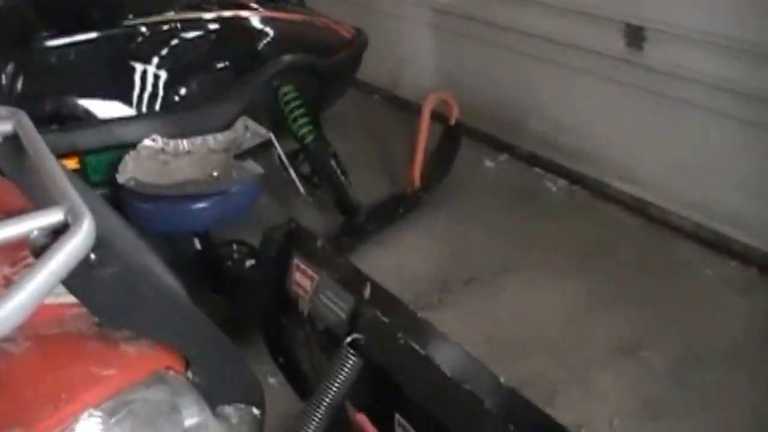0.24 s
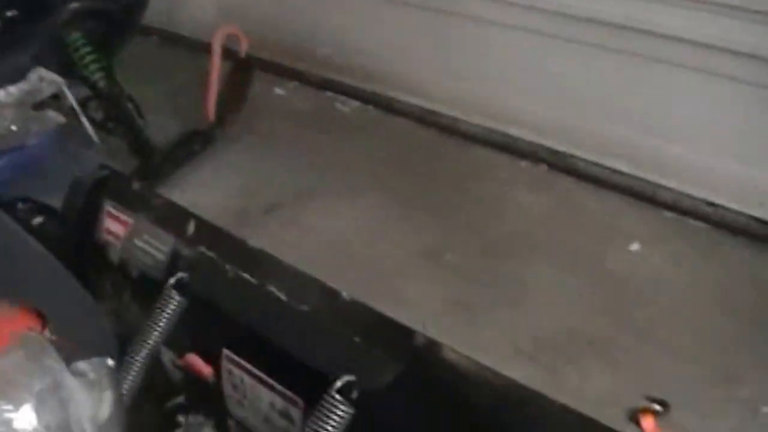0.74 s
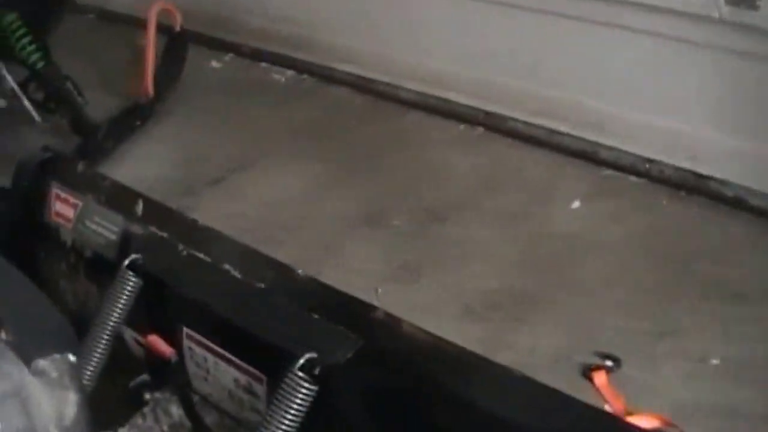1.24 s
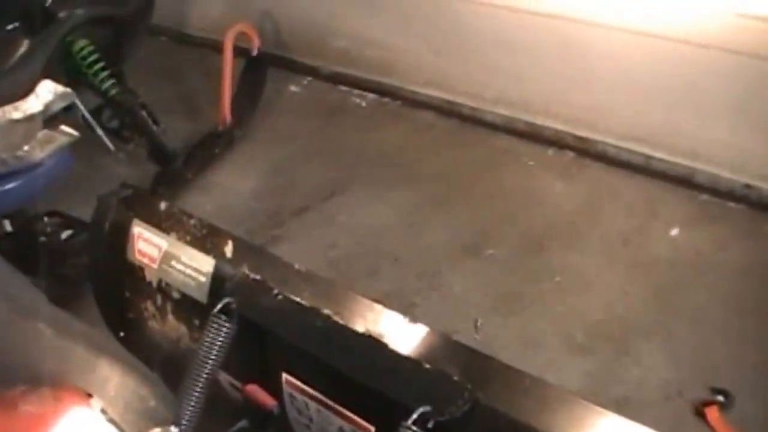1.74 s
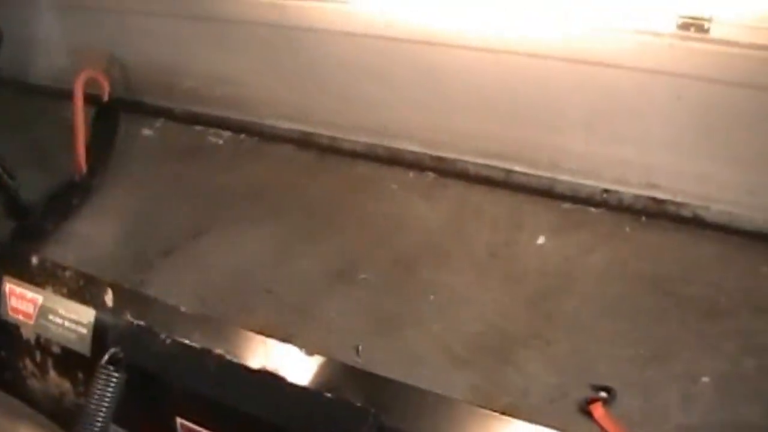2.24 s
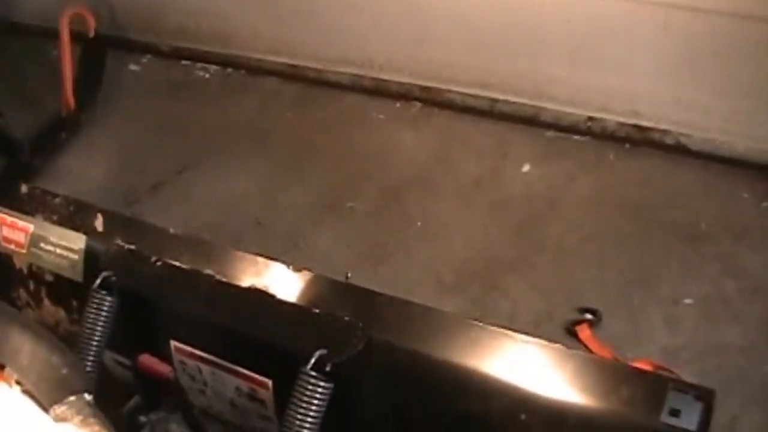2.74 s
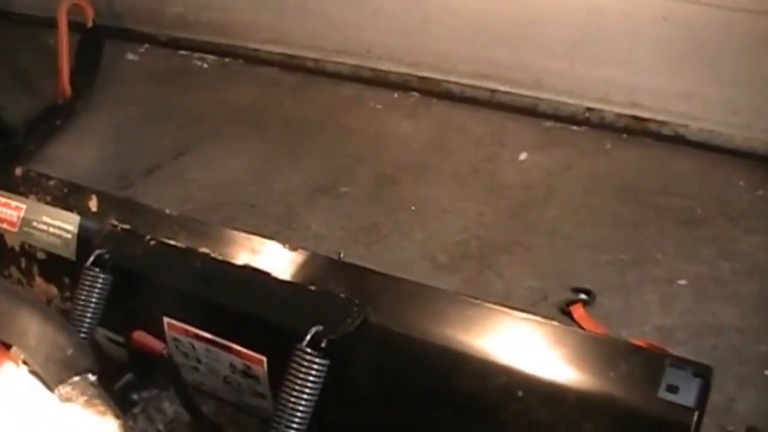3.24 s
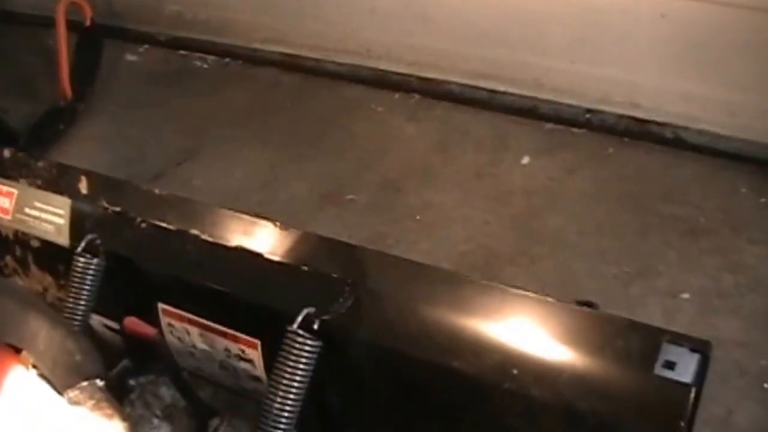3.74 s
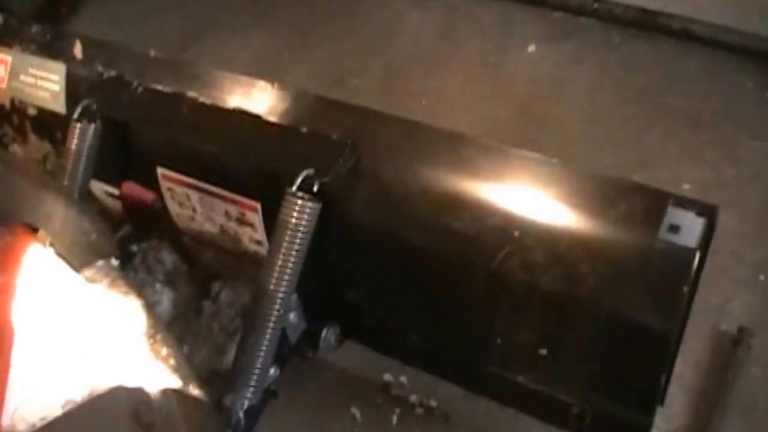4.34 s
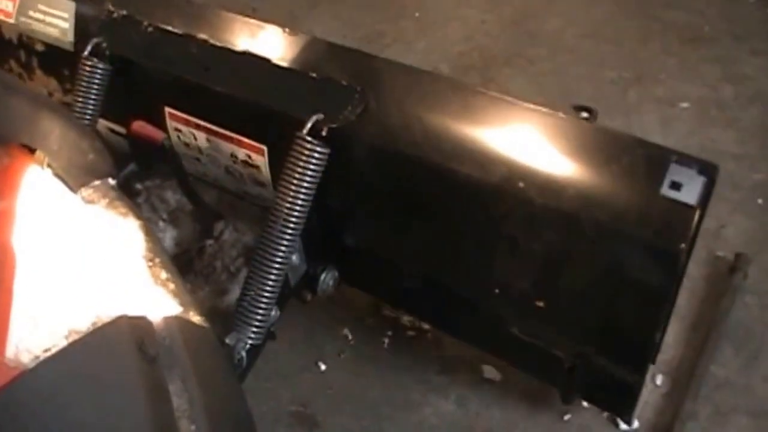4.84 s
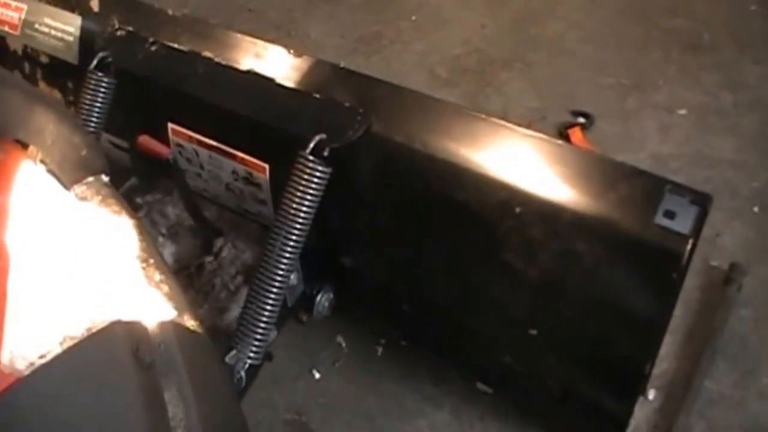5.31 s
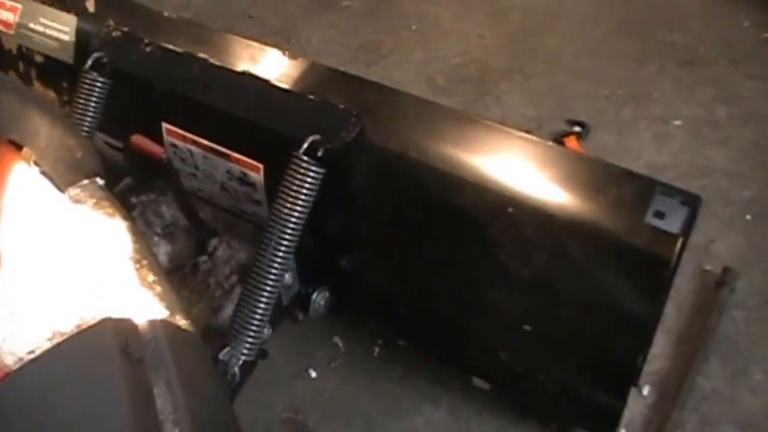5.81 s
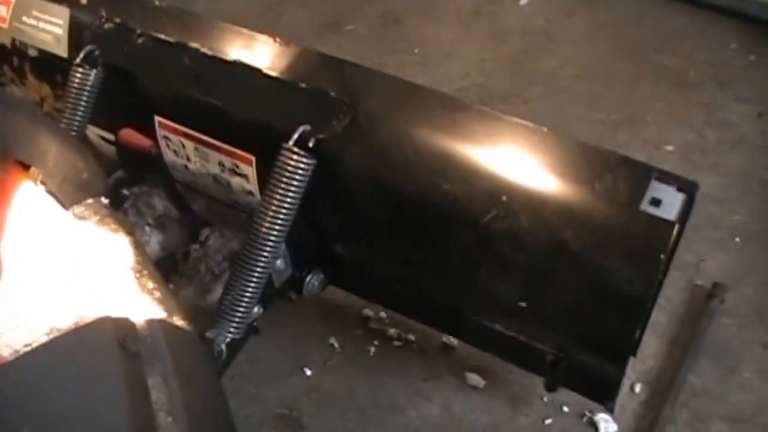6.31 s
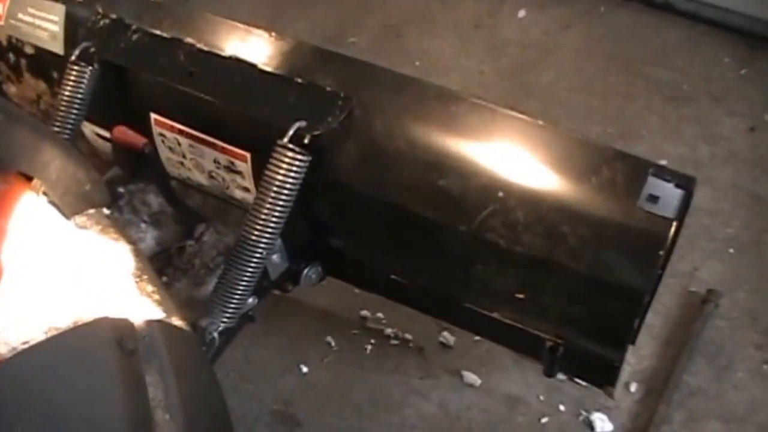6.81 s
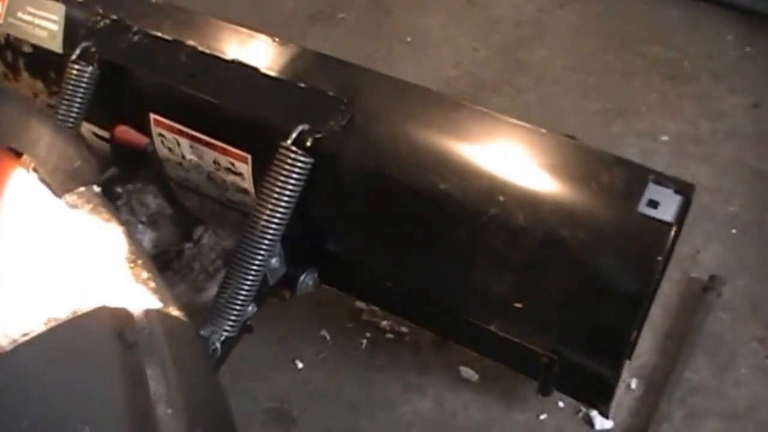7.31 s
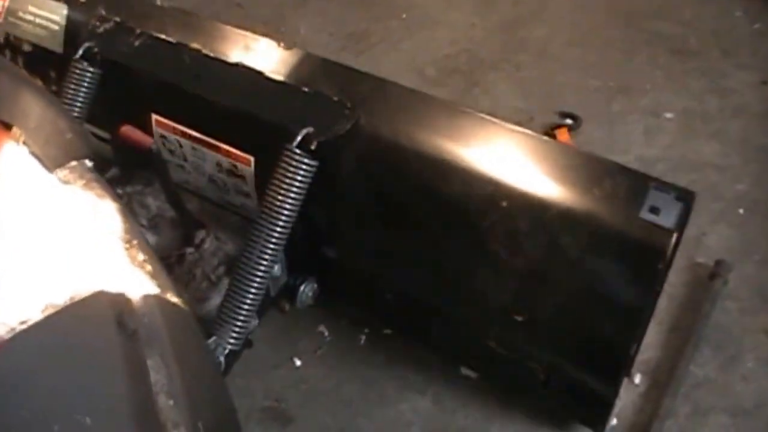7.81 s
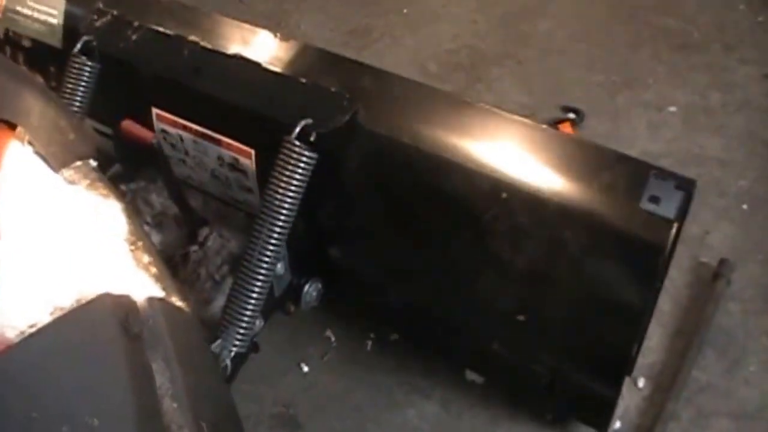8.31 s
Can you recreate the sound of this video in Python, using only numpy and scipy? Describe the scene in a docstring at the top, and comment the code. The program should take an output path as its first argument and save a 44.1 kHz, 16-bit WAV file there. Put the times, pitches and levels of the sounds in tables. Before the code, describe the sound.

A quiet garage with soft hiss: cloth rubs, a few sharp clicks, a high buzzing pump whirr. Then hard relay clacks each launch a loud, rough electric winch whine, lowering and lifting a steel plough blade in turn. The blade clanks and hums as it jolts and lands. Close stereo microphone, hard-walled reverberation, short pauses between the runs.

```python
"""Plough winch in a garage

An electric winch lowers and lifts a steel plough blade in a concrete garage, close to a camera's stereo microphone.
First hands shuffle, small parts click and a fuel pump whirrs: repeating noise, whistles, buzz and a low hum.
Then a solenoid clacks before each motor run: tooth overtones over gearbox noise and brush hiss.
The blade rings at each jolt in decaying sines, and the garage answers with echoes of shaped noise.
Thuds of the frame and a quiet floor of hiss and faint tones lie beneath.
"""
import sys
import numpy as np
from scipy import signal
from scipy.fft import rfft, irfft, next_fast_len
from scipy.io import wavfile
from scipy.ndimage import uniform_filter1d, map_coordinates

SR = 44100
rng = np.random.default_rng(int(sys.argv[2]) if len(sys.argv) > 2 else 0)


def master_out(mix):
    """Clip the mix to full scale and print it as 16-bit PCM to the path in sys.argv[1]."""
    frames = np.transpose(np.atleast_2d(mix))
    ceiling = np.clip(frames, -1, 1)
    pcm = np.round(ceiling * 32767).astype(np.int16)
    wavfile.write(sys.argv[1], SR, pcm)


N = 377496
TIME = np.arange(N) / SR

# Levels are relative: trims in the functions and in scene() set the final balance.
# Motor runs, lowering and lifting in turn: [start t/s, powered t/s, brush hiss level/dB, gear growl level/dB,
# full tooth rate f/Hz, spin-up t/s, coasting fade of the hiss (dB/s)]
MOTOR_RUNS = [(2.797, .15, -18, -18.5, 580, .05, 140), (3.32, 0.72, -20, -21, 548, .06, 141),
              (4.49, 0.69, -20, -20, 533, 0.067, 107), (5.736, 0.87, -19, -20.5, 540, .06, 191),
              (6.945, 0.92, -20.5, -20, 528, .055, 84), (8.212, 0.55, -19.5, -20, 553, .055, 150)]
# Overtones of the tooth rate: [multiple, lifting level/dB, lowering level/dB]
TOOTH_OVERTONES = [(.5, -19.5, -23.5), (1, -7, -8), (2, -4, -3), (3, -5, -15), (4, -14.5, -12.5),
                   (5, -10, -22), (6, -18, -20.5), (7, -19, -33), (8, -18, -24), (10, -17, -23)]
# Gearbox noise: [f/Hz, level/dB per Hz]
GEARBOX_SPECTRUM = [(15, -65), (25, -72), (134, -43), (248, -12.5), (341, -8.5), (532, 2), (763, -5.5),
                    (1070, 1), (1270, -3), (1640, -0.5), (4000, -22), (5200, -65), (8800, -120)]
# Brush hiss: [f/Hz, level/dB per Hz]
BRUSH_SPECTRUM = [(1180, -25.5), (2000, -4), (2160, -4.5), (2420, -6.5), (2630, -2), (2870, -4.5),
                  (3440, -4.5), (7460, 1), (10800, -18.5), (15600, -47.5)]
# Dull rumble left after coasting: [f/Hz, level/dB per Hz]
REST_SPECTRUM = [(71, -55), (120, -22), (166, -13), (311, -11.5), (361, -6), (678, -3.5), (1150, -16.5),
                 (1660, -15.5), (4000, -24), (5200, -56), (8800, -120)]
# Brief dips of the motor's level: [t/s, depth/dB]
MOTOR_DIPS = [(4.883, 11.7), (7.849, 7)]
# Blade jolted as the rope takes up slack and as it lands on the floor: [t/s, level/dB]
BLADE_JOLTS = [(2.828, -32), (3.335, -12.5), (4.375, -33), (4.507, -19.5), (5.165, -14.5), (5.775, -22),
               (7.77, -14.5), (8.228, -23)]
# Ringing modes of the steel blade: [f/Hz, level/dB, t60/s, rise t/s]
BLADE_MODES = [(434, -4.5, 0.74, 0.0074), (701, 5.5, 0.31, 0.0071), (760, 2, 0.35, 0.008),
               (980, -7, 0.11, 0.0048), (1225, 12, 0.14, 0.0067)]
# Low hums as the landed blade rocks: [t/s, level/dB]
BLADE_ROCKS = [(3.05, -50), (5.2, -42), (5.45, -47), (7.85, -37), (8.1, -37)]
# Solenoid closing: [t/s, peak level/dB, thump/dB over that level]
SOLENOID_CLACKS = [(2.7934, -6, -23), (3.3157, -6.5, -34), (4.4862, -7, -21), (5.7333, -5, -6.5),
                   (6.9425, -8.5, -15), (8.2101, -7, -9)]
# Key, switch and linkage clicks: [t/s, peak level/dB, thump/dB over that level, t60/s]
SMALL_CLICKS = [(0.4979, -47, 6, 0.063), (0.674, -30.5, -25.5, 0.13), (1.032, -21, -3, 0.06),
                (1.042, -26, -4, 0.06), (1.0628, -27, -1, 0.071), (1.951, -36, -6, 0.04),
                (1.253, -31, 2, 0.085), (1.292, -12, -11, 0.055), (1.866, -28.5, -3, 0.068),
                (2.3035, -29, 6, 0.13), (3.0018, -14.5, 5.5, 0.12), (3.189, -19, -2, 0.09),
                (3.2194, -32, -29, 0.095), (5.1861, -15, 7, 0.081), (5.4554, -27, 4, 0.062),
                (5.4864, -26, 4.5, 0.078), (5.5357, -20, 2.5, 0.12), (5.676, -34, -2, 0.0988),
                (5.6994, -36, 1, 0.13)]
# Bright noise of clicks and rustling: [f/Hz, level/dB per Hz]
BRIGHT_SPECTRUM = [(700, -39.5), (1500, -3), (2200, 1.5), (3300, 2), (5000, 2.5), (7800, 5.5), (10000, -6),
                   (14000, -18.5), (16000, -51)]
# Low noise of knocks and rubbing: [f/Hz, level/dB per Hz]
THUMP_SPECTRUM = [(120, -28), (300, -15.5), (550, -2.5), (1100, -6), (2000, -9), (4000, -23), (8000, -59)]
# Strokes of hands and clothes: [peak t/s, rustle level/dB, low rub level/dB, brightest f/Hz, rise t/s, t60/s]
HAND_STROKES = [(.45, -50, -48, 7000, .08, 0.15), (.505, -39, -40, 1750, 0.031, 0.38),
                (.72, -35.5, -48, 4100, 0.08, 0.31), (.785, -34, -41.5, 3000, 0.022, 0.15),
                (1.004, -23, -32, 5200, 0.0034, 0.2), (1.035, -31, -29, 2980, 0.018, 0.17),
                (1.06, -30.5, -39, 1800, 0.023, 0.16), (1.31, -32.5, -35.5, 3000, 0.026, 0.73),
                (1.8, -55, -39, 800, 0.042, 0.83), (1.87, -29, -35.5, 2200, 0.0045, 0.33),
                (1.93, -40, -40, 1500, .03, 0.25), (2.306, -46, -27.5, 1200, .004, 0.24)]
# Fuel pump notes: [from t/s, whistle base f/Hz, level/dB at 2x base, level/dB at 3x base,
# buzz level/dB, narrow band f/Hz]
PUMP_NOTES = [(1.3, 3175, -54, -59, -77, 7430), (1.87, 3140, -74, -69, -57, 7670),
              (2.08, 3167, -60, -70, -57, 7830), (2.36, 3180, -59, -63, -60, 7300)]
# Whirr of the pump: [f/Hz, level/dB per Hz]
WHIRR_SPECTRUM = [(710, -51.5), (1200, -9), (2170, -14), (2690, -14), (3670, -11.5), (5820, -10),
                  (7300, -1), (12900, -25), (14700, -35.5), (15600, -73)]
# Pump buzz: [multiple of the turn rate]
BUZZ_MULTIPLES = [34, 35, 36, 39, 41, 42, 44, 45, 47, 50, 51]
# Strength of those multiples: [level/dB]
BUZZ_LEVELS = [-13, -12, -11, -10, -2, -1, 0, -6, -8, -9, -9]
# Dull thuds of the frame: [t/s, level/dB]
FRAME_THUDS = [(2.787, -54), (2.936, -47), (3.322, -52), (3.409, -48), (3.561, -53), (4.018, -51),
               (4.492, -49), (4.811, -52), (4.91, -55), (5.174, -49), (5.74, -49), (6.036, -53),
               (6.94, -52), (7.115, -55), (7.275, -52), (7.779, -46), (8.204, -50)]
# Frame shudder in the bass: [f/Hz, level/dB per Hz]
SHUDDER_SPECTRUM = [(15, -15), (30, -2), (60, -3), (130, 6), (200, -34)]
# Decay of the garage: [f/Hz, t60/s]
GARAGE_DECAY = [(200, 2.9), (600, 0.97), (2000, 0.89), (6000, 0.6), (12000, 0.27)]
# Likeness of the echoes at the two microphone ports: [f/Hz, left-right likeness]
PORT_LIKENESS = [(60, 0.9), (250, 1), (1000, 0.93), (5000, 0.91), (7000, 0.92), (9000, 0.146),
                 (11500, 0.16), (15000, 0.86)]
# Background hiss: [f/Hz, level/dB per Hz]
FLOOR_SPECTRUM = [(15, -84), (25, -50), (254, -22.5), (275, -16), (323, -25), (380, -12), (435, -18),
                  (585, -19), (786, -13.5), (950, -18), (1030, -18), (7770, -33.5), (15600, -49)]
# Faint, nearly steady tones: [f/Hz, level/dB]
FAINT_TONES = [(382.2, -71.5), (576.0, -65.5), (931.3, -63.5), (958.2, -61.5), (1147, -68)]

TEETH = 21  # per turn
START_SHARE, COAST_LOSS = .83, .05  # first speed over full speed; share lost a second while coasting
SPIN_SHAPE = 1.1, 2.2  # lowering: creeps up to full speed; lifting: hangs back under the load, then jumps
SURGE_DB, SURGE_S = 2.5, 0.16  # extra effort at each start and its decay time
BITE_S, DIP_S = .025, 0.018  # time for the brushes to come up; half width of a dip
GROWL_FADE_SHARE = 0.68  # the growl's coasting fade over that of the hiss
REST_DB = -36, -46.5  # after lowering (blade on the floor), after lifting (blade raised)
SUSTAIN_HZ, SUSTAIN_WIDTH_HZ, SUSTAIN_DB = 549, 0.75, -12  # a long-ringing mode of the winch housing, fed while lifting
STROKE_RISE_DB, BRIGHT_DB, BRIGHT_OCTAVES = 17, 11.5, 1  # climb of a stroke; its bright band's boost and width
PUMP_TURN_HZ, PUMP_HUM_HZ, PUMP_HUM_DB = 50, 95, -75
WHIRR_DB, BAND_DB = -47, -54
PUMP_GLIDE_S, PUMP_UP_S, PUMP_OFF_S = .1, 0.24, 2.8  # change of note; run-up; moment it stops
PUMP_FADE_DB = 55  # a second, once it stops
THUD_T60, THUD_RISE_S, THUD_SIDE = .2, .01, .2  # the last: share that differs between the ports
ROOM_LOW_HZ = 150  # the garage answers little below this
FLOOR_DB = -55.5
TOP_LEVEL, TOP_HZ = .85, 15800


def winch():
    """Meshing teeth sing over gearbox noise and brush hiss that throb once a turn."""
    hiss, growl, speed, lifting, age = motor()
    teeth = np.cumsum(speed * (1 + 0.004012 * wobble(8) + 0.00612 * wobble(40))) / SR
    turns = teeth / TEETH
    growl = growl * (1 - np.exp(-age / 0.0099))  # the gears need a moment to take up their play
    throb_db = 1.47 * np.cos(2 * np.pi * turns) + 0.96 * np.cos(4 * np.pi * turns + 1)
    chatter_db = 2.72 * wobble(35)  # the load on the teeth comes and goes
    grit = amp(1.2 * wobble(400))  # single teeth and commutator bars strike harder

    whine = tooth_whine(teeth, turns, growl, lifting, chatter_db)
    rumble = amp(-2.0 + throb_db + 0.63 * chatter_db) * unit(grit * noise(GEARBOX_SPECTRUM))
    rest = amp(np.array(REST_DB)[lifting] + 3.0 * wobble(30)) * (age > 0) * noise(REST_SPECTRUM)
    brush_db = throb_db + .5 * chatter_db + 1.16 * wobble(14)
    brushes = hiss * amp(brush_db) * unit(grit * noise(BRUSH_SPECTRUM))
    gears = growl * (whine + rumble) + rest
    return amp(-1.5) * (gears + sustained_mode(growl, lifting, age) + brushes)


def motor():
    """Each run surges, spins up, holds and coasts: hiss gain, growl gain, teeth a second, lifting, age."""
    rows = np.array(MOTOR_RUNS)
    run = np.clip(np.searchsorted(rows[:, 0], TIME) - 1, 0, None)
    start, powered, hiss_db, growl_db, full, spin_up, fade = rows[run].T
    lifting = run % 2  # 0 lowering, 1 lifting
    age = np.maximum(TIME - start, 0)
    coast = np.maximum(age - powered, 0)

    dip_db = sum(db * np.exp(-((TIME - s) / DIP_S) ** 2) for s, db in MOTOR_DIPS)
    effort_db = SURGE_DB * np.exp(-age / SURGE_S) - dip_db
    hiss = amp(hiss_db + effort_db - fade * coast) * (1 - np.exp(-age / BITE_S))
    growl = amp(growl_db + effort_db - GROWL_FADE_SHARE * fade * coast) * (age > 0)
    lag = np.exp(-(age / spin_up) ** np.array(SPIN_SHAPE)[lifting])
    speed = full * (1 - (1 - START_SHARE) * lag) * (1 - COAST_LOSS * coast)
    return hiss, growl, speed, lifting, age


def tooth_whine(teeth, turns, growl, lifting, chatter_db):
    """Overtones of the tooth rate get side lines from uneven teeth and flutter from their play."""
    whine = np.zeros(N)
    for k, up_db, down_db in TOOTH_OVERTONES:
        flutter = wobble(90) + 1j * wobble(90) + .5 * (wobble(200) + 1j * wobble(200))
        uneven = 0.6 + 0.6 * per_turn(turns, count=3) + .5 * flutter
        level = amp(np.where(lifting, up_db, down_db) + chatter_db + 1.55 * wobble(30))
        whine += level * np.real(uneven * np.exp(2j * np.pi * k * teeth))
    # unloaded teeth hardly sing while the motor coasts
    return whine * np.clip(growl / amp(-23.5), 0, 1) ** 2.6


def per_turn(turns, count):
    """A random complex shape that repeats every turn: the same uneven parts pass again."""
    orders = np.arange(-count, count + 1)
    sizes = rng.standard_normal(len(orders)) + 1j * rng.standard_normal(len(orders))
    sizes = sizes / (1 + np.abs(orders) / 5.5)
    grid = np.arange(256) / 256
    shape = unit(np.exp(2j * np.pi * np.outer(grid, orders)) @ sizes)
    return shape[(turns % 1 * 256).astype(int)]


def sustained_mode(growl, lifting, age):
    """A narrow mode of the winch housing slowly stores and releases the motor's growl while lifting."""
    stored = filtered(growl * lifting, lambda hz: 1 / (1 + 1j * hz / SUSTAIN_WIDTH_HZ))
    level = amp(SUSTAIN_DB + 2.4 * wobble(21)) * stored * (age > 0)
    return level * np.sin(2 * np.pi * SUSTAIN_HZ * TIME)


def blade():
    """The steel blade rings low at each jolt, its modes at new strengths."""
    ring = np.zeros(N)
    for s, db in BLADE_JOLTS:
        for hz, level, t60, rise in BLADE_MODES:
            gain = amp(db - 12.5 + level + rng.normal(0, 2.7))
            ring += gain * fading([(s, 0)], t60, rise) * np.sin(2 * np.pi * hz * (TIME - s))
    return ring


def rocking():
    """The landed blade rocks: a low, wavering hum near 172 Hz swells and dies."""
    cycle = 2 * np.pi * np.cumsum(172 + 5 * wobble(14)) / SR
    return fading(BLADE_ROCKS, 0.88, 0.029) * amp(3 * wobble(25)) * np.sin(cycle)


def solenoid():
    """The solenoid clacks shut just before each run: a snap with bright and low noise."""
    return knocks(SOLENOID_CLACKS, 0.13, snap_db=2)


def small_clicks():
    """Key, switch and linkage knock with a sharper snap, each dying at its own speed."""
    return knocks(SMALL_CLICKS, [row[3] for row in SMALL_CLICKS], snap_db=11.5)


def knocks(rows, t60, snap_db):
    """An impact gives a sharp snap, then bright and low noise dying away."""
    bright = [(s, db) for s, db, *_ in rows]
    low = [(s, db + thump_db) for s, db, thump_db, *_ in rows]

    def shape(events):
        """Slow decay plus a short snap."""
        return fading(events, t60) + amp(snap_db) * fading(events, 0.0062)

    sound = shape(bright) * noise(BRIGHT_SPECTRUM) + shape(low) * noise(THUMP_SPECTRUM)
    # small parts radiate no bass
    return amp(-5.5) * filtered(sound, lambda hz: (1j * hz / (300 + 1j * hz)) ** 2)


def hands():
    """Cloth and plastic rub in clumpy grains; each stroke swells and dies with its own brightest band."""
    grain = amp(1.8 * wobble(150) + 0.82 * wobble(33.6))
    rustle = unit(grain * noise(BRIGHT_SPECTRUM))
    rub = unit(grain * noise(THUMP_SPECTRUM))
    sound = np.zeros(N)
    hz = np.fft.rfftfreq(SR, 1 / SR)
    for s, rustle_db, rub_db, bright_hz, rise, t60 in HAND_STROKES:
        first = round(s * SR) - SR // 4
        span = slice(first, first + SR)  # one second, the peak a quarter of the way in
        t = TIME[span] - s
        octaves = np.log2((hz + 1) / bright_hz)
        bump = amp(BRIGHT_DB * np.exp(-(octaves / BRIGHT_OCTAVES) ** 2))
        cloth = unit(irfft(rfft(rustle[span]) * bump, SR))
        swell = amp(np.where(t < 0, STROKE_RISE_DB * t / rise, -60 * t / t60))
        sound[span] += swell * (amp(rustle_db) * cloth + amp(rub_db) * rub[span])
    return amp(-3.0) * sound


def pump():
    """Fuel pump: whirr that mostly repeats each turn, thin whistles, buzz, a narrow noise band and a low hum."""
    starts, *notes = np.transpose(PUMP_NOTES)
    stage = np.clip(np.searchsorted(starts, TIME) - 1, 0, None)
    glide = uniform_filter1d(np.array(notes)[:, stage], round(PUMP_GLIDE_S * SR))
    whistle_hz, low_db, high_db, buzz_db, band_hz = glide
    run_up = np.clip((TIME - starts[0]) / PUMP_UP_S, 0, 1) ** 2
    running = run_up * amp(-PUMP_FADE_DB * np.maximum(TIME - PUMP_OFF_S, 0))

    repeat = np.resize(rng.standard_normal(SR // PUMP_TURN_HZ), N)
    whirr = amp(WHIRR_DB) * coloured(.5 * repeat + 0.34 * rng.standard_normal(N), WHIRR_SPECTRUM)
    cycle = 2 * np.pi * np.cumsum(whistle_hz * (1 + 0.00062 * wobble(30.36))) / SR
    whistle = amp(low_db) * np.sin(2 * cycle) + amp(high_db) * np.sin(3 * cycle)
    buzz = np.zeros(N)
    for k, db in zip(BUZZ_MULTIPLES, BUZZ_LEVELS):
        phase = 2 * np.pi * k * PUMP_TURN_HZ * TIME + rng.uniform(0, 2 * np.pi)
        buzz += amp(buzz_db + db + 2.5 * wobble(13)) * np.sin(phase)
    band = amp(BAND_DB) * unit(wobble(900) * np.sin(2 * np.pi * np.cumsum(band_hz) / SR))
    hum = amp(PUMP_HUM_DB + 3 * wobble(7)) * np.sin(2 * np.pi * PUMP_HUM_HZ * TIME + 2.2 * wobble(20))
    tonal = amp(3.0 + 0.87 * wobble(20)) * (whistle + buzz)
    return running * (whirr + hum + band + tonal)


def thuds():
    """Short bursts of the frame's shudder, too low to wake the room."""
    mid, side = noise(SHUDDER_SPECTRUM), THUD_SIDE * noise(SHUDDER_SPECTRUM)
    envelope = fading(FRAME_THUDS, THUD_T60, THUD_RISE_S)
    return amp(4.5) * envelope * np.array([mid + side, mid - side])


def garage(x):
    """Concrete echoes die at a speed set by frequency; the moving camera meets a new pattern every 0.2 s."""
    hop = SR // 5
    window = np.hanning(2 * hop)  # successive patterns crossfade
    wet = np.zeros((2, N + 3 * hop + SR))
    x = np.pad(x, (hop, 2 * hop))
    for start in range(0, N + hop, hop):
        hz, t, z = signal.stft(rng.standard_normal((2, SR - 2 * hop)), SR, nperseg=256)
        decay = amp(-60 * t / along(GARAGE_DECAY, hz)[:, None])
        tail = signal.istft(z * decay, SR, nperseg=256)[1]
        piece = x[start:start + 2 * hop] * window
        echo = signal.fftconvolve(piece[None], tail / np.linalg.norm(tail[0]), axes=1)
        wet[:, start:start + echo.shape[1]] += echo
    wet = wet[:, hop - 300:][:, :N]  # the echoes start 300 samples after the direct sound
    mid, side = filtered(wet, lambda hz: (1j * hz / (ROOM_LOW_HZ + 1j * hz)) ** 2)

    def width(hz):
        """Side over mid gain that sets the likeness of the two ports."""
        return 1.92 * np.tan(np.arccos(np.clip(along(PORT_LIKENESS, hz), 0, 1)) / 2)

    side = filtered(side, width)
    return np.array([mid + side, mid - side])


def floor():
    """Quiet, wide hiss with a few faint, wavering tones in the middle."""
    tones = np.zeros(N)
    for hz, db in FAINT_TONES:
        tones += amp(db + 0.5 + 2.4 * wobble(19)) * np.sin(2 * np.pi * hz * TIME + 0.41 * wobble(7.3))
    mid, side = noise(FLOOR_SPECTRUM), 0.83 * noise(FLOOR_SPECTRUM)
    return tones + amp(FLOOR_DB - 2.5) * np.array([mid + side, mid - side])


def amp(db):
    """Gain of a level in dB."""
    return 10 ** (np.asarray(db) / 20)


def unit(x):
    """x at rms 1."""
    return x / np.sqrt(np.mean(np.abs(x) ** 2) + 1e-20)


def along(points, hz):
    """Values between (f/Hz, value) points on a log frequency axis."""
    f, v = np.transpose(points)
    return np.interp(np.log(hz + 1), np.log(f + 1), v)


def wobble(rate):
    """A smooth random curve, rate knots a second."""
    return map_coordinates(rng.standard_normal(int(N * rate / SR) + 4), [TIME * rate])


def filtered(x, response):
    """x times a response of frequency."""
    m = next_fast_len(N + SR // 2)
    return irfft(rfft(x, m) * response(np.fft.rfftfreq(m, 1 / SR)), m)[..., :N]


def coloured(x, spectrum):
    """x through a spectrum, at rms 1."""
    return unit(filtered(x, lambda hz: amp(along(spectrum, hz))))


def noise(spectrum):
    """Fresh noise of rms 1."""
    return coloured(rng.standard_normal(N), spectrum)


def fading(events, t60, rise=0.0013):
    """Envelope of quick starts (t/s, level/dB) that lose 60 dB in t60 seconds."""
    envelope = np.zeros(N)
    for (s, db), t in zip(events, np.broadcast_to(t60, len(events))):
        since = np.maximum(TIME - s, 0)
        envelope += amp(db - 60 * since / t) * (1 - np.exp(-since / rise))
    return envelope


def scene():
    """Close sources and their garage echoes, over the frame's thuds and the floor."""
    near = winch() + blade() + rocking() + solenoid() + small_clicks() + hands() + pump()
    return amp(-1.0) * near + amp(-7.5) * garage(near) + thuds() + floor()


def record(dry):
    """The camera rounds off the highest peaks and keeps nothing above its band limit."""
    soft = dry / (1 + np.abs(dry / TOP_LEVEL) ** 4) ** (1 / 4)
    return filtered(soft, lambda hz: hz < TOP_HZ)


dry = scene()
out = record(dry)
master_out(out)
```